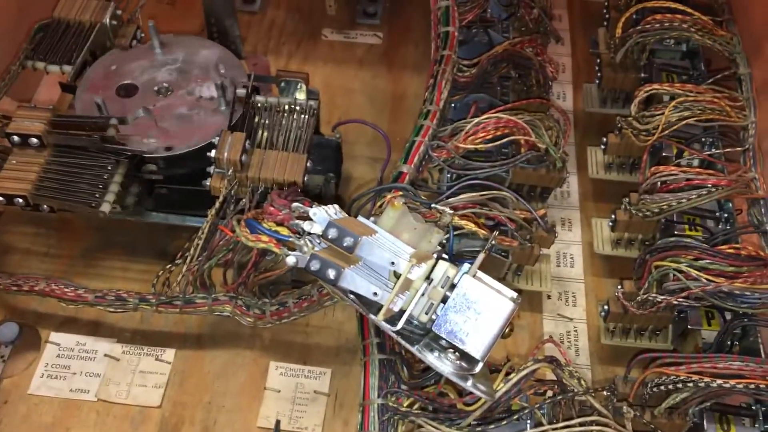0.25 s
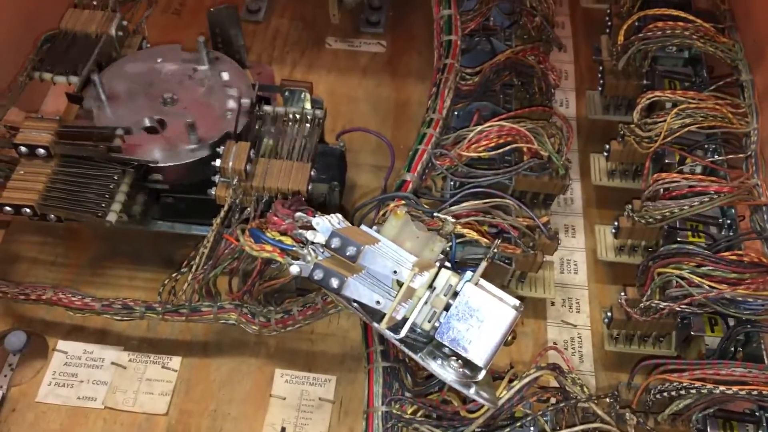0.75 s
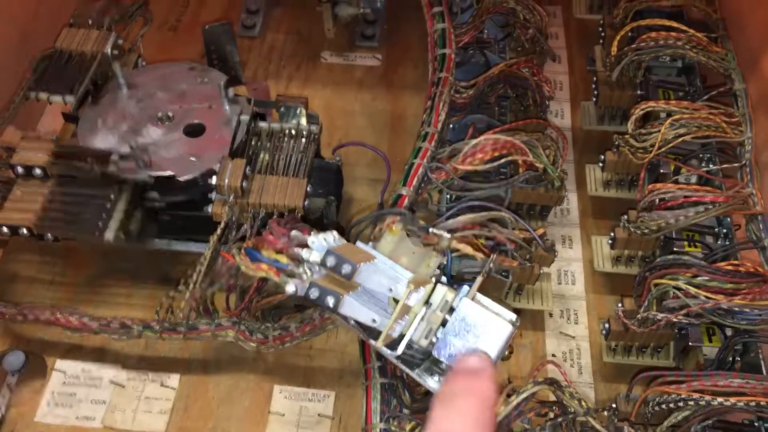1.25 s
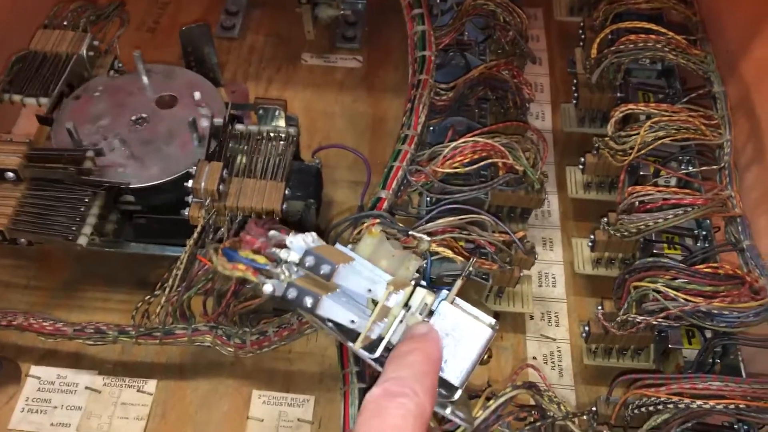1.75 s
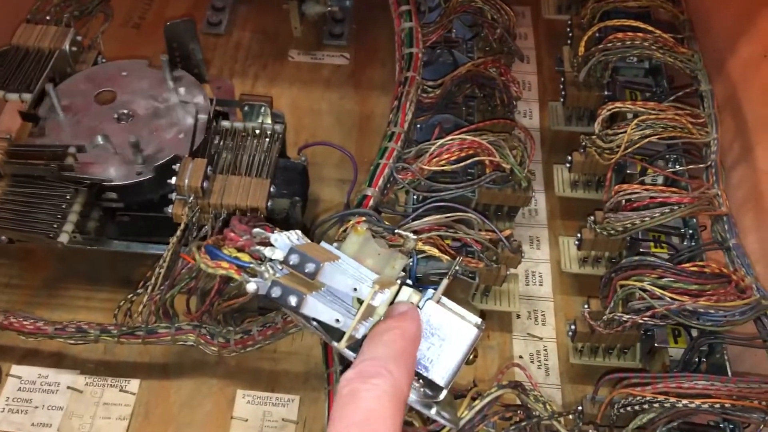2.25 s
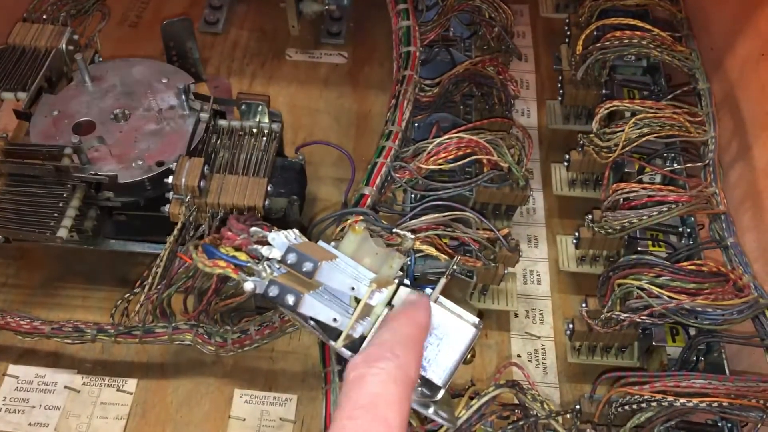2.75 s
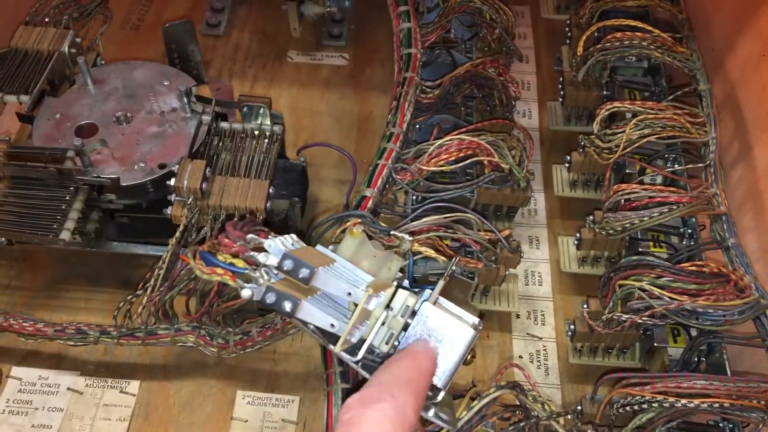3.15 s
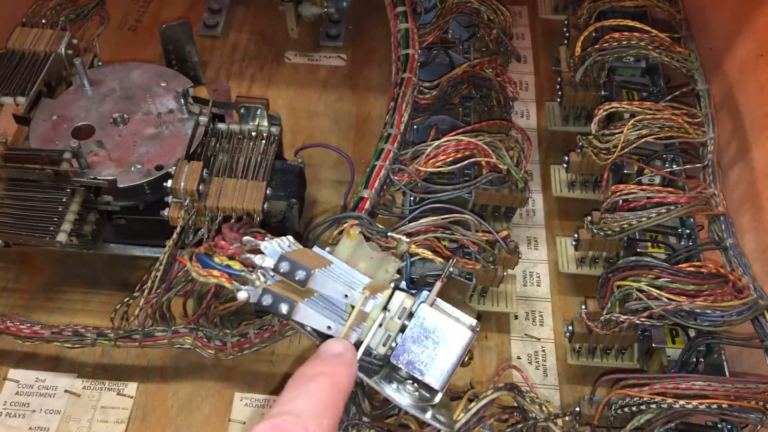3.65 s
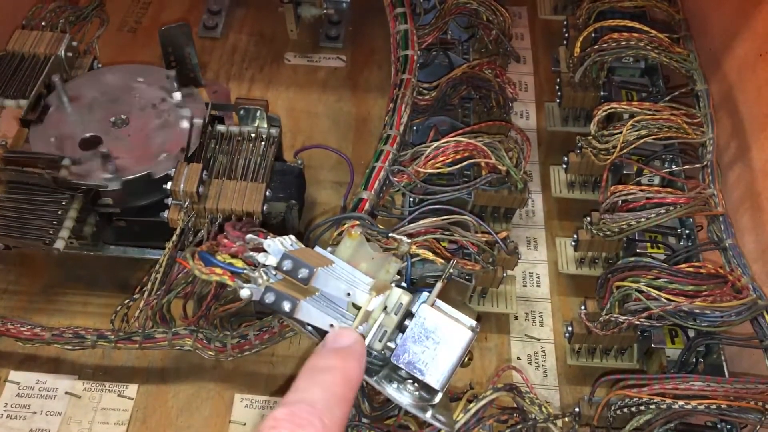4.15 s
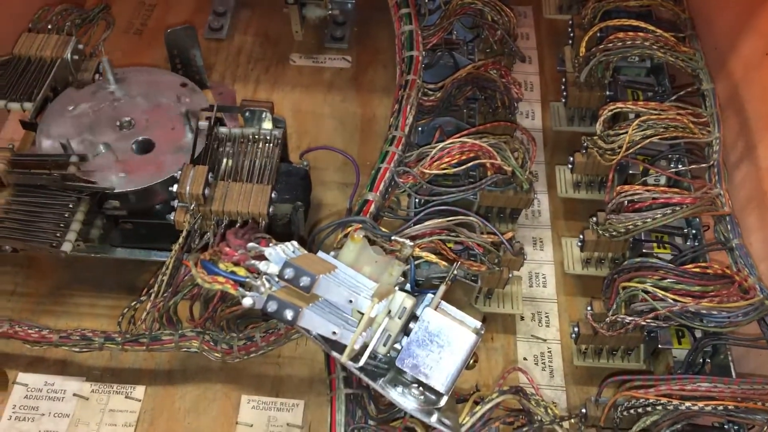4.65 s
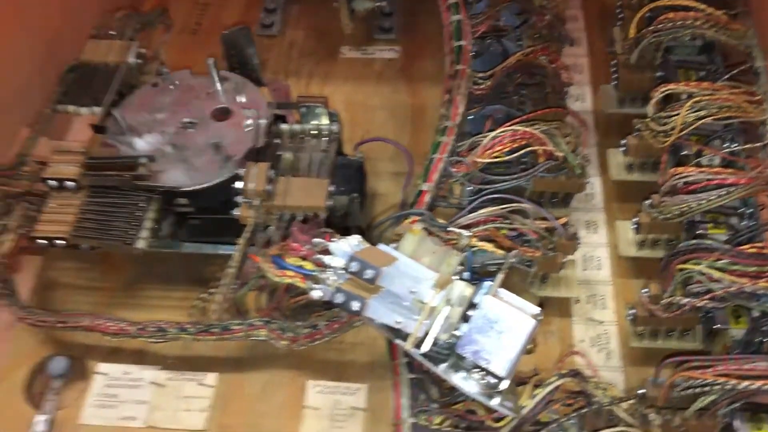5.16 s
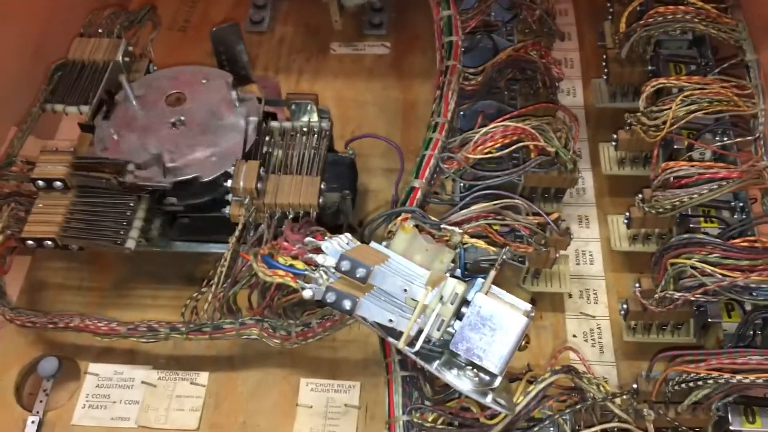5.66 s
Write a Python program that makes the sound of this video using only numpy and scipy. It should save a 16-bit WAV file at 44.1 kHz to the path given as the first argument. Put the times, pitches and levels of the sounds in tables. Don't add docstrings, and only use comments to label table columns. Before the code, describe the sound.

Fast metallic relay clatter over a grinding gear motor halts for about a second of faint hum, then snaps back with heavier thuds.

```python
import sys
import numpy as np
from scipy import signal
from scipy.fft import rfft, irfft
from scipy.io import wavfile

SR = 44100
rng = np.random.default_rng(int(sys.argv[2]) if len(sys.argv) > 2 else 0)


def to_wav(s):
    ch = np.atleast_2d(s).T
    pcm = np.round(np.clip(ch, -1, 1) * 32767)
    wavfile.write(sys.argv[1], SR, pcm.astype(np.int16))


def field_ratio(decibels):
    return 10 ** (np.asarray(decibels, dtype=float) / 20)


N = 260631


def rms_one(x):
    return x / np.sqrt(np.mean(x ** 2) + 1e-20)


def drift(per_s):
    r = np.exp(-80 * np.pi * per_s / SR)
    noise = rng.standard_normal(N // 40 + 2002)
    slow = rms_one(signal.lfilter([1], [1, -2 * r, r * r], noise)[2000:])
    return np.interp(np.arange(N) / 40, np.arange(len(slow)), slow)


def peak(x, hz, width_hz):
    r = np.exp(-np.pi * width_hz / SR)
    poles = [1, -2 * r * np.cos(2 * np.pi * hz / SR), r * r]
    return signal.lfilter([(1 - r * r) / 2, 0, (r * r - 1) / 2], poles, x)


def resonant(x, modes, vary_db=0):
    out = x.copy()
    for hz, width_hz, level_db in modes:
        if vary_db:
            level_db = level_db + vary_db * drift(5.7)[:len(x)]
        out += peak(x * field_ratio(level_db), hz, width_hz)
    return out


def coloured(x, spectrum, low_hz=25, high_hz=20000):
    size = 8192
    hz = np.arange(size // 2 + 1) * SR / size + 1
    points_hz, level_db = np.transpose(spectrum)
    gain = field_ratio(np.interp(np.log(hz), np.log(points_hz), level_db))
    gain /= np.sqrt((1 + (low_hz / hz) ** 6) * (1 + (hz / high_hz) ** 6))
    cepstrum = irfft(np.log(gain + 1e-9))
    cepstrum[1:size // 2] *= 2
    cepstrum[size // 2 + 1:] = 0
    return signal.oaconvolve(x, irfft(np.exp(rfft(cepstrum))))[:len(x)]


def grains(per_s, spread_db):
    sizes = field_ratio(spread_db * np.minimum(rng.exponential(1, N), 2.5)) * rng.choice([-1, 1], N)
    return rms_one(sizes * (rng.random(N) < per_s / SR) + 1e-9)


def bursts(times_s, levels_db, lengths_s, rise_s, tail_db, crack_db=-40, order=1.21):
    out, t = np.zeros(N + 8000), np.arange(8000) / SR
    for s, level_db, length_s in zip(times_s, levels_db, np.broadcast_to(lengths_s, len(times_s))):
        length_s = np.clip(length_s, .003, .08)
        fall = np.exp(-2 * (t / length_s) ** order)
        fall += field_ratio(tail_db) * np.exp(-t / length_s)
        fall += field_ratio(crack_db) * np.exp(-t / .002)
        out[round(s * SR):][:len(t)] += field_ratio(level_db) * (1 - np.exp(-t / rise_s)) * fall
    return out[:N]


FRAME_HZ = 990, 1500, 1620, 1800, 2950, 3500, 3800, 4600, 5260, 5710, 8900, 9650, 13250, 13800
# (width [Hz], on pull-in [dB], on drop-back [dB], under heavy coil [dB])
FRAME = [(44.64, 2, 5.1, 5), (79, 5.5, 1.7, 4.3), (70, 10, 11, 3.4), (69.8, 3, 9.9, 1.3),
         (150, -2, 0.67, 0.67), (95, -21, 1.7, 4.76), (150, 3.5, 8.2, 7.3), (120, -7.5, 1.2, 1.9),
         (146, -4, 13, 1.4), (70, 6.5, 5.3, 4), (150, 6.5, 3, 1.8), (193, 6, 4, 1), (90, 8, 2, 1.4),
         (100, 7.5, 2, 1.5)]


def frame(order, low_hz, high_hz):
    return [(hz, row[0], row[order]) for hz, row in zip(FRAME_HZ, FRAME) if order and low_hz <= hz < high_hz]


CABINET_HZ = 125, 186, 330, 381, 500, 608, 720
# (width [Hz], level [dB])
CABINET = [(30, 8), (24, 10), (45, 7), (30, 11), (45, 4), (34, 7.5), (50, 1)]


def cabinet():
    return [(hz, *row) for hz, row in zip(CABINET_HZ, CABINET)]


def clatter(events, colour, per_s, spread_db, body_lag_s, body_stretch, vary_db, order):
    s, treble_db, knock_db, body_db, length_s = np.transpose(events)
    knock_hz, treble_hz = 800, 2500
    shower = grains(per_s, spread_db) * field_ratio(2.2 * drift(120))
    parts = (
        (treble_db - 12.5, treble_hz, 20000, frame(order, treble_hz, SR), 0, 1),
        (treble_db + knock_db - 8.5, knock_hz, treble_hz, frame(order, 0, treble_hz), 0, 1.2),
        (treble_db + body_db - 5, 150, knock_hz, cabinet(), body_lag_s, body_stretch))
    out = 0
    for level_db, low_hz, high_hz, modes, lag_s, stretch in parts:
        unit = np.std(resonant(coloured(shower[:SR // 2], colour, low_hz, high_hz), modes))
        envelope = bursts(s + lag_s, level_db, length_s * stretch, rise_s=.0014, tail_db=-17,
                          crack_db=-6, order=1.9)
        driven = coloured(shower * envelope, colour, low_hz, high_hz)
        out = out + resonant(driven + 1e-12, modes, vary_db) / unit
    return out


TURNS = [
    [-.157, .6212, 1.4003, 2.1804],
    [4.205, 4.984, 5.7626],
]


def cam(lobes, turns, gains_db=0):
    rows = []
    for turn_s, gain_db in zip(turns, np.broadcast_to(gains_db, len(turns))):
        rows += [(turn_s + s, db + gain_db, *rest) for s, db, *rest in lobes]
    return [row for row in rows if 0 < row[0] < N / SR]


# (frequency [Hz], density [dB per Hz])
AIR = [(15, -51), (25, -15.5), (123, -5.5), (161, -29), (242, -14), (309, -22.5), (476, -25.5),
       (887, -32.5), (1290, -29), (1650, -36.5), (16000, -50)]
# (time [s], level [dB])
RUSTLE = [
    (3.45, -90.5),
    (3.55, -74),
    (3.7, -77.5),
    (3.85, -74.5),
    (4.03, -78),
]
# (frequency [Hz], level [dB rms])
HUM = [(118.4, -60), (242.2, -75), (360.7, -71), (479.1, -79), (597.5, -80), (958.2, -85.5), (1200, -90.5),
       (1319, -84.5)]


def workshop_air():
    t = np.arange(N) / SR
    out = field_ratio(-62) * rms_one(coloured(rng.standard_normal(N), AIR))
    rustle = grains(per_s=3000, spread_db=3)
    rustle = rms_one(peak(rustle, 1100, 150) + 1.8 * peak(rustle, 1650, 300))
    s, level_db = np.transpose(RUSTLE)
    out += field_ratio(np.interp(t, s, level_db, -150, -150) - 1.5) * rustle
    for hz, level_db in HUM:
        out += field_ratio(level_db + .3 + 3.5 * drift(5)) * np.sin(2 * np.pi * (hz * t + rng.random()))
    return out


def motor_db(first_db, again_db, busy_db, down_db_per_s, up_db_per_s):
    t = np.arange(N) / SR
    off_s, up_to_speed_s = 2.83, 4.12
    busy = 0
    for turn_s in TURNS[1]:
        inside_s = np.minimum(t - turn_s + .03, turn_s + .6 - t)
        busy = busy + np.clip(inside_s / .07 + 1, 0, 1)
    first = first_db - down_db_per_s * np.maximum(t - off_s, 0)
    again = again_db + busy_db * busy - up_db_per_s * np.maximum(up_to_speed_s - t, 0)
    return np.maximum(first, np.where(t > LATCHES[1][0], again, -200))


# (frequency [Hz], density [dB per Hz])
RUMBLE = [(26, -49.5), (45, -17.5), (282, -7.5), (372, -3.5), (444, -7), (604, -2), (810, -14),
          (1500, -12.5), (1950, -54.5), (3300, -120)]
# (frequency [Hz], density [dB per Hz])
RATTLE = [(530, -34), (900, -1.5), (1620, -4.5), (3300, -7.5), (5220, -7.5), (6330, -13), (9650, -10),
          (16000, -17)]
# (before pause [dB], after pause [dB], coil swell [dB], run-down [dB/s], run-up [dB/s])
MOTOR_LAYERS = [
    (-33.5, -35.5, 4.5, 600, 450),
    (-39.5, -37.5, 6, 260, 300),
    (-53, -41, 4, 30, 100),
]


def motor():
    rumble = coloured(grains(per_s=1300, spread_db=3), RUMBLE, 25.2, 2426)
    rumble = rms_one(resonant(rumble, cabinet()))
    rattle = rms_one(coloured(grains(per_s=8000, spread_db=3.5), RATTLE, 720))
    rattle *= field_ratio(1.5 * drift(30))
    drone = rms_one(peak(peak(rng.standard_normal(N), 90, 18), 90, 30))
    rumble_db, rattle_db, drone_db = (motor_db(*layer) for layer in MOTOR_LAYERS)
    return field_ratio(rumble_db + .5) * rumble + field_ratio(rattle_db - 2) * rattle + field_ratio(drone_db + 1.5) * drone


# (time [s], ring of each of the four steel parts [dB] x 4)
PULLS_FIRST = [(-.023, -30, -31, -40, -28), (.1124, -42, -26.5, -30, -37), (.2498, -34, -37, -25, -34),
               (.3855, -26.5, -24, -39, -25), (.6205, -33.5, -36, -41, -33), (.7555, -21, -15.5, -28, -21),
               (.8916, -25, -24, -22, -18), (1.0286, -35, -52, -36, -28), (1.1625, -39, -32, -29, -27),
               (1.3995, -35, -35, -31, -30), (1.5345, -34.5, -23.5, -34, -36), (1.672, -42, -37, -33, -28),
               (1.8074, -34, -30, -28, -21), (1.9424, -25.5, -20, -31, -24), (2.1795, -40, -39, -33, -39),
               (2.3125, -33, -34, -39, -39), (2.4495, -41, -46, -43, -47), (2.5860, -35, -41, -31, -27),
               (2.7202, -32, -18, -35, -23)]
PULLS_AGAIN = [(4.205, -44, -32, -34, -29), (4.3387, -30, -13.5, -30, -17), (4.477, -33, -31, -24, -24),
               (4.61, -39, -36, -25, -24), (4.7489, -39, -30, -43, -25), (4.984, -34, -30, -26, -28),
               (5.1172, -33, -21, -33, -30), (5.2555, -41, -28, -21, -21), (5.392, -41, -33, -22, -28),
               (5.5254, -27, -17, -31, -30), (5.7626, -37, -32, -45, -41), (5.8994, -30, -28, -43, -47)]


def pulls():
    pull_db, sag_db = -13.5, -1.8
    first = [(s, pull_db, *rings_db) for s, *rings_db in PULLS_FIRST]
    return first + [(s, pull_db + sag_db, *rings_db) for s, *rings_db in PULLS_AGAIN]


STEEL_HZ = 8523, 11554, 12043, 15315
# (t60 [s], extra level [dB])
STEEL = [(.45, -.5), (.2, 1), (.14, 1), (.12, -4)]
# (frequency [Hz], level re clatter [dB], t60 [s])
PINGS = [(5290, -10, 0.03), (5990, -14.5, .08), (9500, -17, 0.022)]


def ringing():
    pad = SR // 3
    out, t = np.zeros(N + SR), np.arange(pad) / SR
    touches_s = [row[0] for row in drops()] + [LATCHES[0][0]]
    chance = rng.random((len(pulls()), 2, len(STEEL) + len(PINGS)))
    for (s, blow_db, *rings_db), (turns, luck) in zip(pulls(), chance):
        damp_db = 0
        for touch_s in touches_s:
            if s + .06 < touch_s < s + .3:
                damp_db = damp_db - 5.5 * np.clip((t - touch_s + s) / .008, 0, 1)
        parts = []
        for hz, (t60_s, extra_db), db in zip(STEEL_HZ, STEEL, rings_db):
            faint_db = .8 * min(0, db + 33)
            parts.append((hz, db + extra_db + faint_db, t60_s))
        for (hz, db, t60_s), odds in zip(PINGS, luck):
            parts.append((hz * (.985 + .03 * odds), blow_db + db - 8 * odds, t60_s))
        for (hz, level_db, t60_s), turn in zip(parts, turns):
            shape = field_ratio(level_db + damp_db - 60 * t / t60_s) * (1 - np.exp(-t / .0015))
            out[round(s * SR) + pad:][:pad] += shape * np.sin(2 * np.pi * (hz * t + turn))
    return out[pad:][:N]


DROPS_FIRST = [(-.07, -13.5, -7, -12, .03), (.056, -15, -5.5, -11, .038), (.202, -12.5, -8, -14, .027),
               (.338, -13, -8, -14, .028), (.473, -13, -6, -10, .031), (.595, -14.5, -10.5, -7, .03)]
DROPS_AGAIN = [(-.069, -13.5, -5, -14, .025), (.068, -16, -4.5, -9, .02), (.203, -18, -2.5, -16, .045),
               (.337, -16, -3.5, -11, .03), (.475, -16, -2.5, -20, .03), (.596, -15, -10, -11, .05)]
STRAY_PAWL = [
    (2.256, -15.5, -9, -29, .014),
]


def drops():
    return cam(DROPS_FIRST, TURNS[0]) + STRAY_PAWL + cam(DROPS_AGAIN, TURNS[1])


# (frequency [Hz], density [dB per Hz])
RELEASE_COLOUR = [(88, -58.5), (150, -8), (391, -12.5), (504, 1), (1020, -11), (1240, -8), (1830, -13.5),
                  (2650, -18), (5360, -21), (8730, -16.5), (16000, -21)]


def releases():
    return clatter(drops(), RELEASE_COLOUR, per_s=9000, spread_db=4.5, body_lag_s=.0021,
                   body_stretch=1.04, vary_db=3, order=2)


# (frequency [Hz], level re knock [dB], t60 [s])
STOP_PINGS = [(381, -2.5, .13), (990, -5, .12), (1620, -7, .08), (1810, -8, .08), (5290, -5, .05)]


def back_stop():
    out, t = np.zeros(N + SR // 4), np.arange(SR // 4) / SR
    chance = rng.random((len(drops()), 2, len(STOP_PINGS)))
    for (s, treble_db, knock_db, *_), (turns, luck) in zip(drops(), chance):
        for (hz, db, t60_s), turn, odds in zip(STOP_PINGS, turns, luck):
            level_db = treble_db + knock_db + db + 1 - 3.1 * odds
            shape = field_ratio(level_db - 60 * t / t60_s) * (1 - np.exp(-t / .0046))
            tone = np.sin(2 * np.pi * (hz * (.99 + .02 * odds) * t + turn))
            out[round(s * SR):][:len(t)] += shape * tone
    return out[:N]


# (frequency [Hz], density [dB per Hz])
STRIKE_COLOUR = [(470, -37), (800, -19), (2800, -6), (3510, -24.5), (4510, -6), (4860, -16), (5240, 0.5),
                 (6020, -17.5), (9810, -8.5), (16000, -21.5)]


def strikes():
    s, level_db = np.transpose(pulls()[1:])[:2]
    shower, modes = grains(per_s=12000, spread_db=1), frame(1, 0, SR)
    unit = np.std(resonant(coloured(shower[:SR // 2], STRIKE_COLOUR, 392), modes))
    driven = shower * bursts(s, level_db - 3.5, .022, rise_s=.00079, tail_db=-21)
    return resonant(coloured(driven + 1e-12, STRIKE_COLOUR, 482), modes, vary_db=3) / unit


# (time into turn [s], peak [dB])
CAM_THUDS = [
    (.062, -22),
    (.61, -23),
]


def thuds():
    t = np.arange(N) / SR
    wander = 1.2 * drift(9)
    tone = np.sin(2 * np.pi * CABINET_HZ[1] * t + wander)
    tone += field_ratio(-9) * np.sin(2 * np.pi * CABINET_HZ[0] * t - wander)
    s, level_db = np.transpose(cam(CAM_THUDS, TURNS[0] + TURNS[1]))
    coil_s, coil_db = np.transpose(coil_strokes())[:2]
    pushes = bursts(s, level_db - 2, .08, rise_s=.012, tail_db=-24)
    pushes += bursts(coil_s + .012, coil_db - 11.5, .055, rise_s=.008, tail_db=-24)
    return pushes * tone


# (time [s], tick peak [dB], blade ring [dB])
FLICKS = [(.599, -37, -33), (.740, -48, -38), (1.082, -37, -58), (1.273, -34.5, -53), (1.378, -34, -38),
          (1.448, -27, -50), (1.865, -34, -55), (2.052, -36, -52), (2.155, -34, -36.5), (2.225, -27, -50),
          (2.635, -31, -50), (2.814, -33, -46), (3.54, -66, -85), (3.58, -67, -88), (4.032, -57, -76)]


def flicks():
    s, tick_db, blade_db = np.transpose(FLICKS)
    tick_colour = [(500, 4.5), (5300, -8.5), (16000, -8.5)]  # (Hz, dB)
    tick = rms_one(coloured(rng.standard_normal(N), tick_colour, 500))
    tick *= bursts(s, tick_db + 1.5, .024, rise_s=.00091, tail_db=-21.5)
    blade = np.sin(2 * np.pi * 14050 * np.arange(N) / SR)
    return tick + blade * bursts(s, blade_db, .035, rise_s=.002, tail_db=-30.5)


# (time [s], treble peak [dB], knock re treble [dB], body re treble [dB], length [s])
LATCHES = [
    (2.852, -5.5, -4, -7, 0.007),
    (4.053, -3, 0, -4, 0.013),
    (4.08, -16, -4, -8, 0.008),
    (4.087, -13, -7, -2, .005),
]
# (frequency [Hz], density [dB per Hz])
LATCH_COLOUR = [(88, -45.5), (150, -6.5), (624, -1), (1360, 3), (1630, 7.5), (3290, -7.5), (3620, -12.5),
                (9440, -15.5), (16000, -30)]


def latches():
    return clatter(LATCHES, LATCH_COLOUR, per_s=14000, spread_db=3.5, body_lag_s=.00059,
                   body_stretch=1.05, vary_db=.5, order=0)


# (time into turn [s], treble peak [dB], knock re treble [dB],
# body re treble [dB], length [s])
COIL = [(-.036, -9, -15, -6, .048), (.048, -14, -11, -8, .04), (.097, -8, -11, -6.5, .038),
        (.186, -14.5, -17, -10, .035), (.238, -7, -11, -7, .04), (.322, -14.5, -17, -10, .035),
        (.374, -8.5, -14, -6, .038), (.447, -16, -16, -8.5, .044), (.509, -8, -14, -10, .045)]
COIL_TURN_DB = 0, -1.5, 0


def coil_strokes():
    return cam(COIL, TURNS[1], COIL_TURN_DB)


# (frequency [Hz], density [dB per Hz])
THUMP_COLOUR = [(88, -40), (230, -13), (354, -5), (504, -23), (888, -10), (1080, -33), (2920, -21.5),
                (3700, -19), (4950, -22.5), (11300, -26.5), (16000, -27)]


def heavy_coil():
    return clatter(coil_strokes(), THUMP_COLOUR, per_s=9700, spread_db=6, body_lag_s=.0025,
                   body_stretch=1.11, vary_db=-.5, order=3)


def room(x):
    t60_s, wall_cut_hz = .38, 2800
    t = np.arange(SR // 2) / SR
    noise = rng.standard_normal((2, len(t)))
    walls = signal.butter(1, wall_cut_hz, fs=SR, output="sos")
    dull = signal.sosfilt(walls, noise[0]) * field_ratio(-60 * t / t60_s)
    bright = noise[1] * field_ratio(-12.5 - 60 * t / (.67 * t60_s))
    tail = (dull + bright) * np.clip(t / .016, 0, 1)
    return signal.oaconvolve(x, tail / np.sqrt(np.sum(tail ** 2)))[:N]


def scene():
    machine = motor() + ringing() + releases() + back_stop() + strikes()
    machine += thuds() + flicks() + latches() + heavy_coil()
    return (machine + field_ratio(-18) * room(machine) + workshop_air())[None]


def band_limit(x):
    return signal.sosfilt(signal.butter(12, 16860, fs=SR, output="sos"), x)


def record(dry):
    rounded = .75 * np.tanh(dry / .75)
    top_cut = signal.cheby2(12, 40, 16000, fs=SR, output="sos")
    return band_limit(signal.sosfilt(top_cut, rounded))


dry = scene()
out = record(dry)
to_wav(out)
```